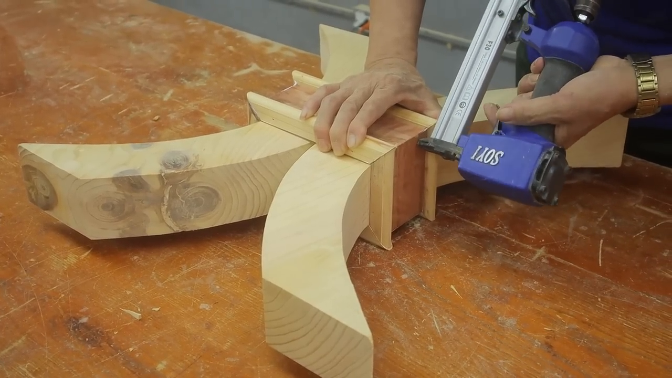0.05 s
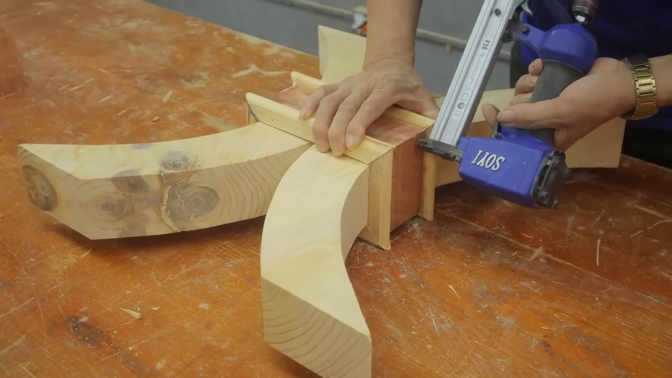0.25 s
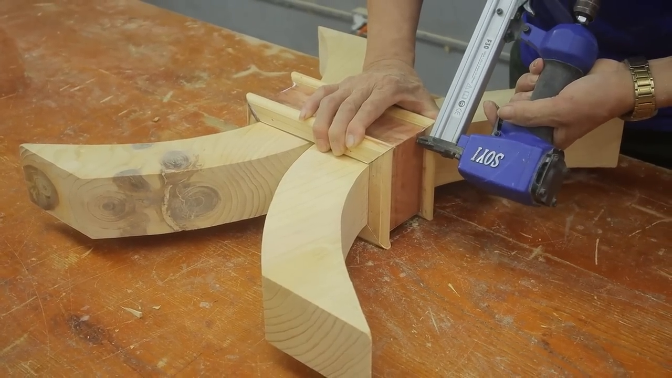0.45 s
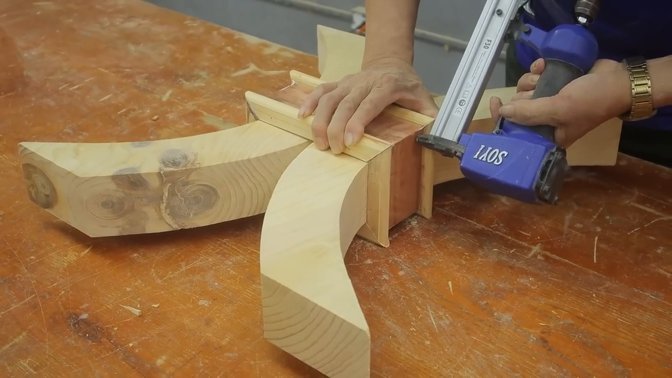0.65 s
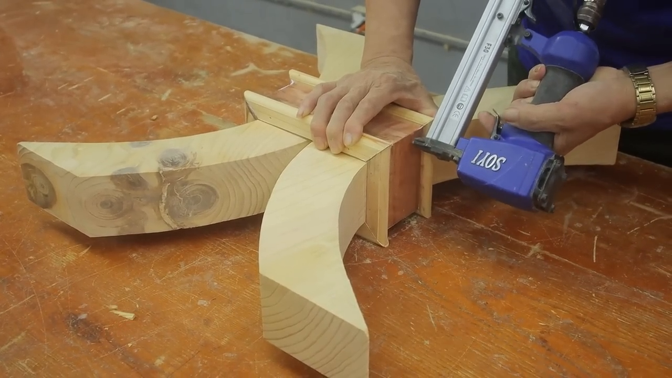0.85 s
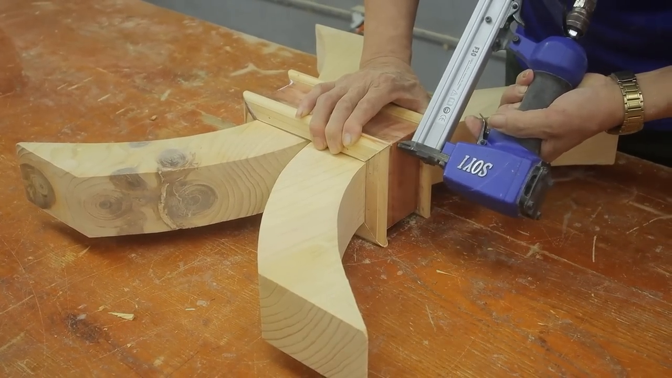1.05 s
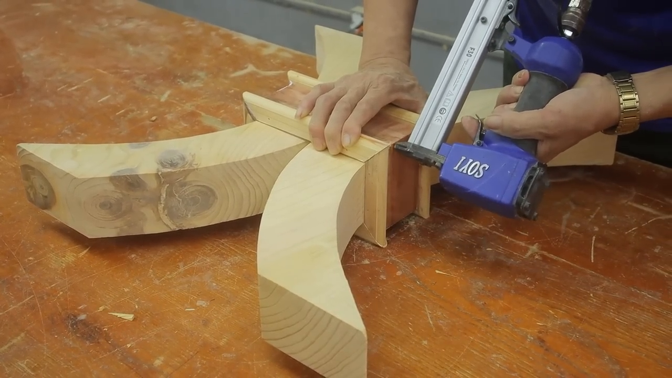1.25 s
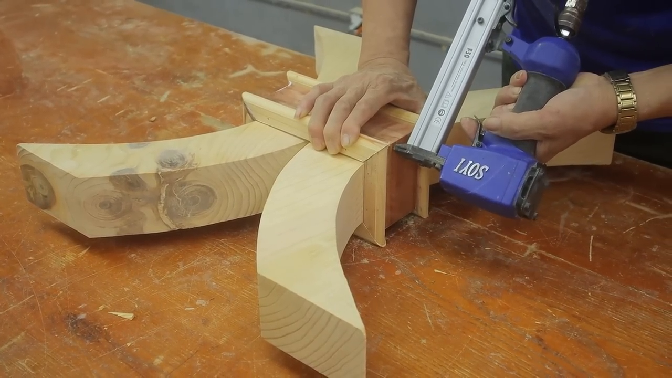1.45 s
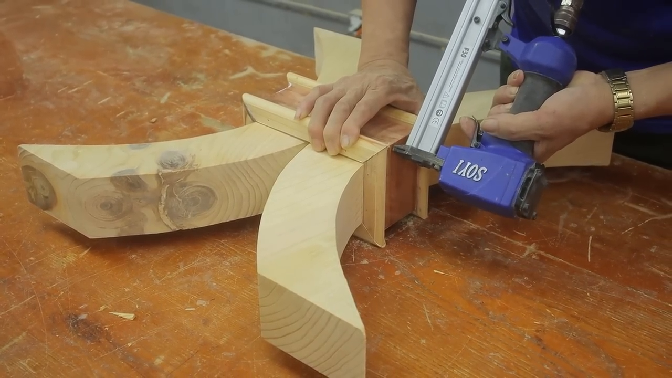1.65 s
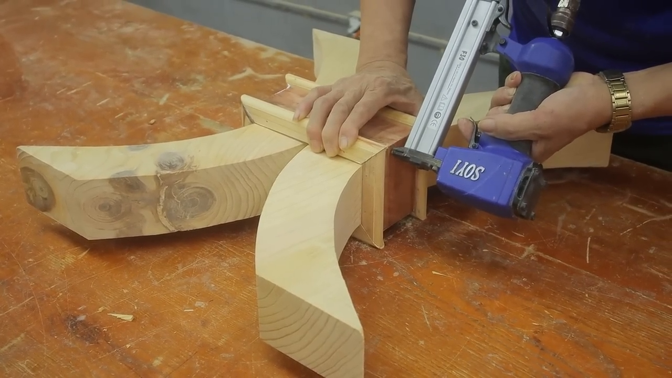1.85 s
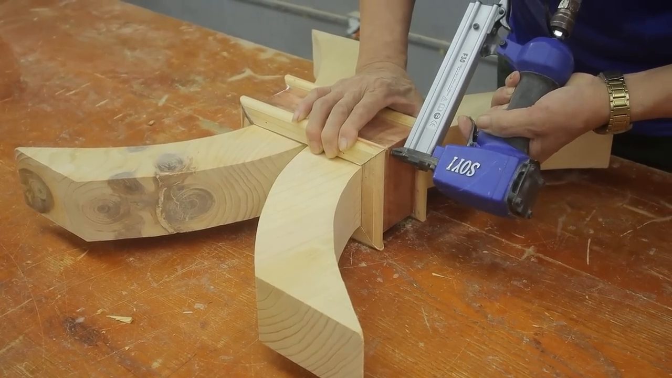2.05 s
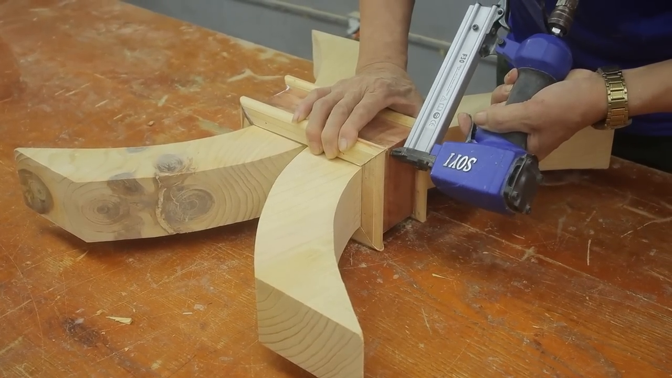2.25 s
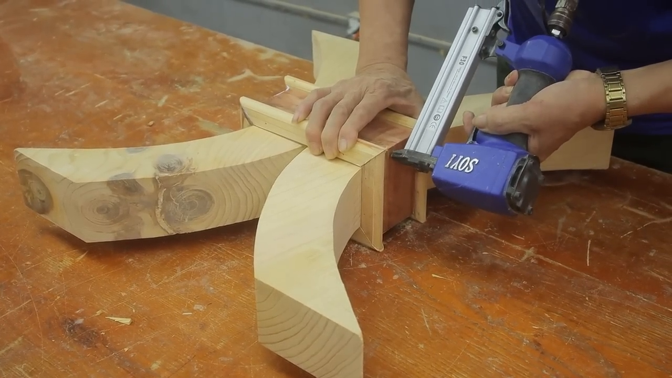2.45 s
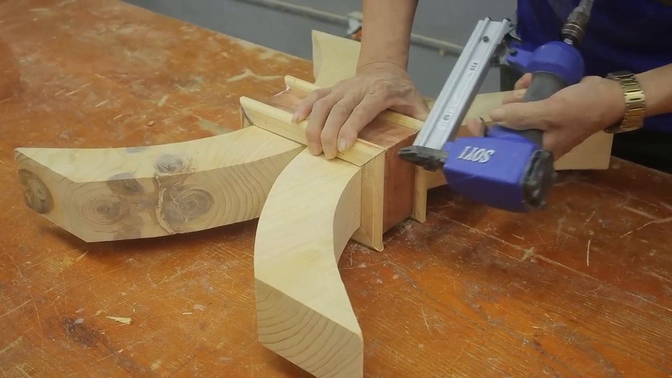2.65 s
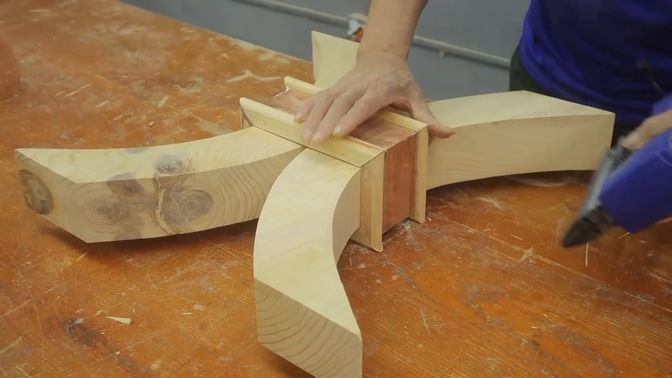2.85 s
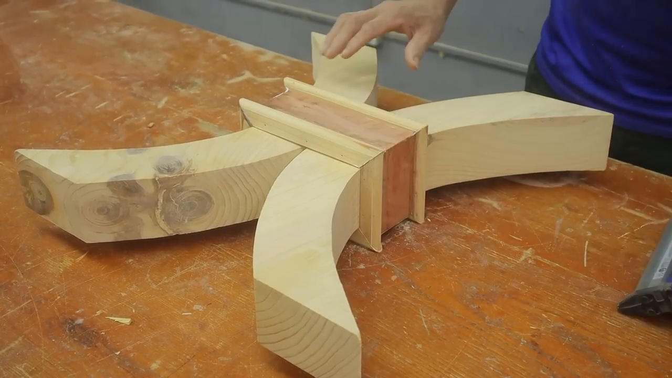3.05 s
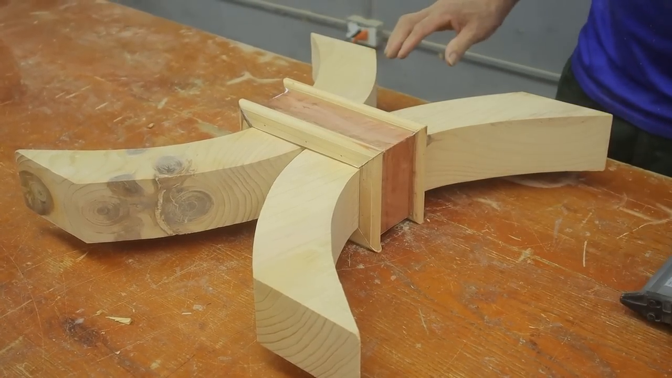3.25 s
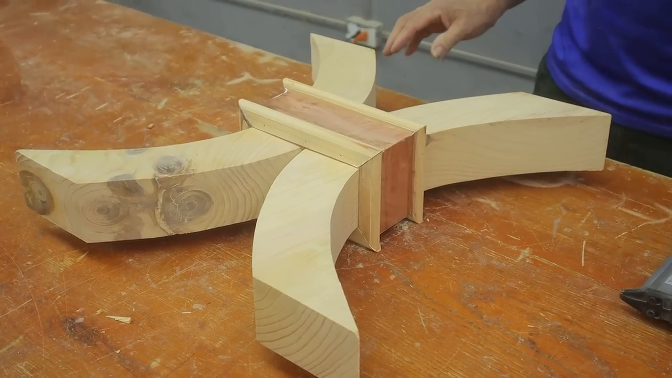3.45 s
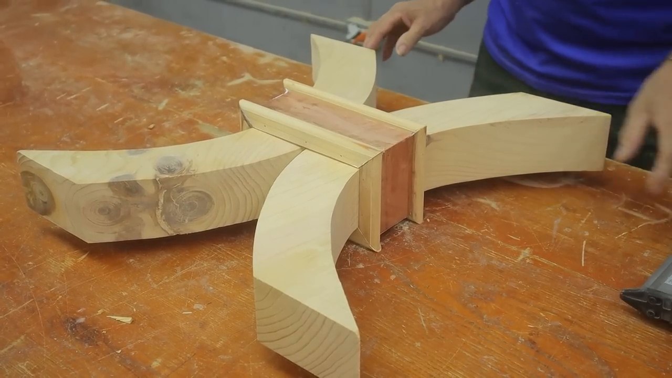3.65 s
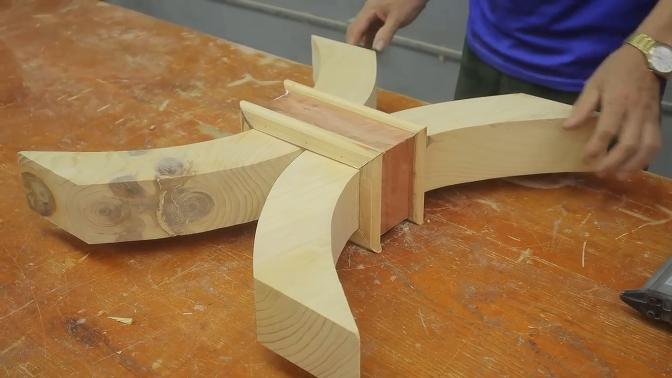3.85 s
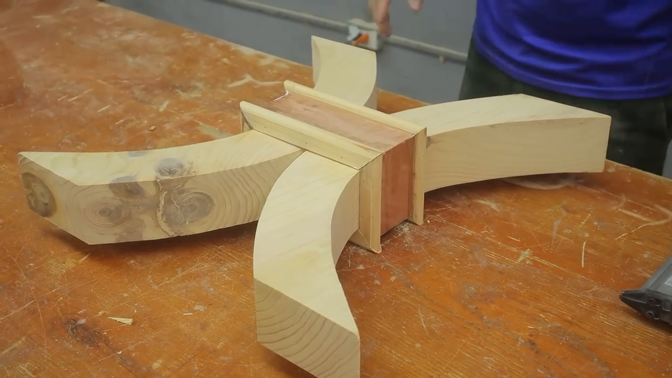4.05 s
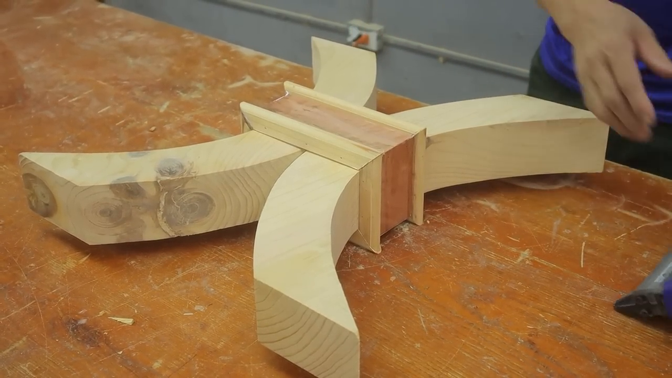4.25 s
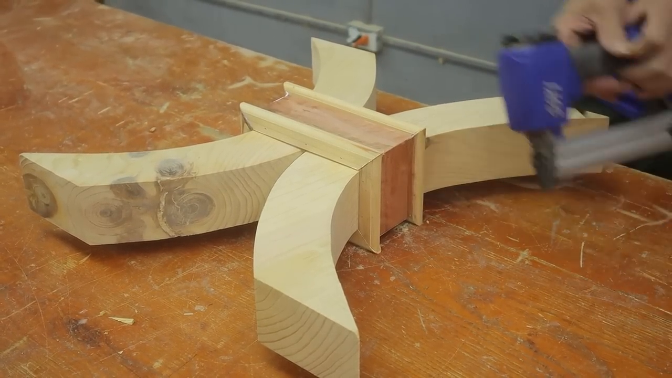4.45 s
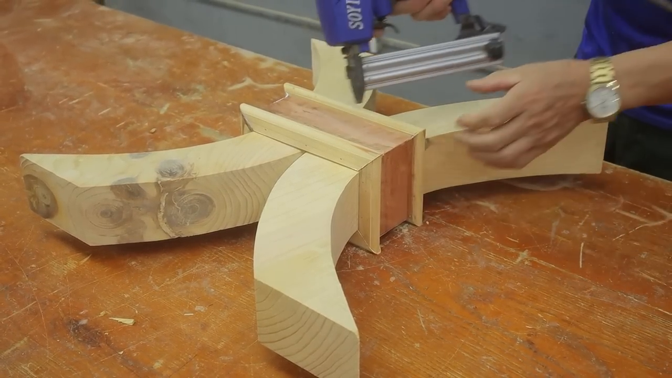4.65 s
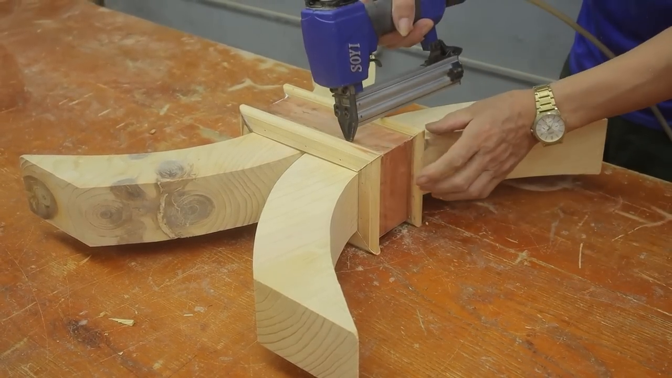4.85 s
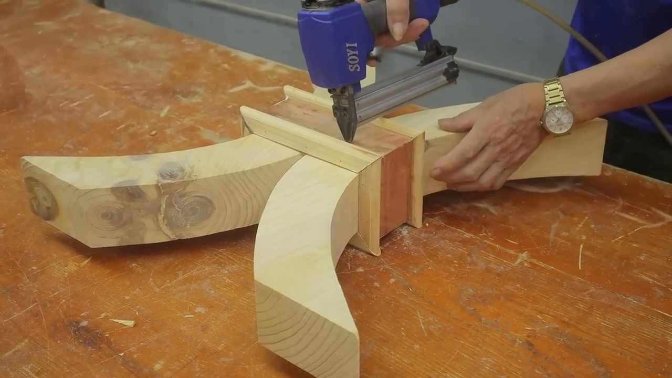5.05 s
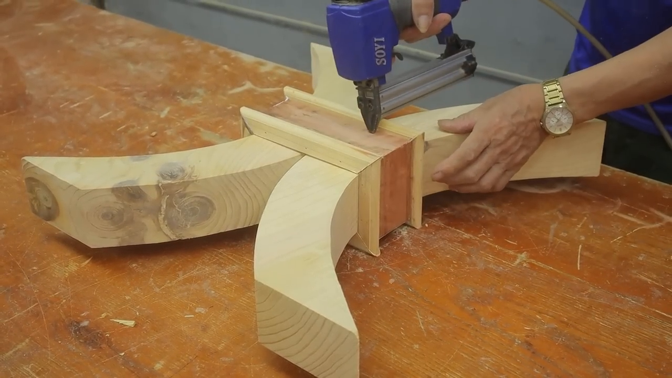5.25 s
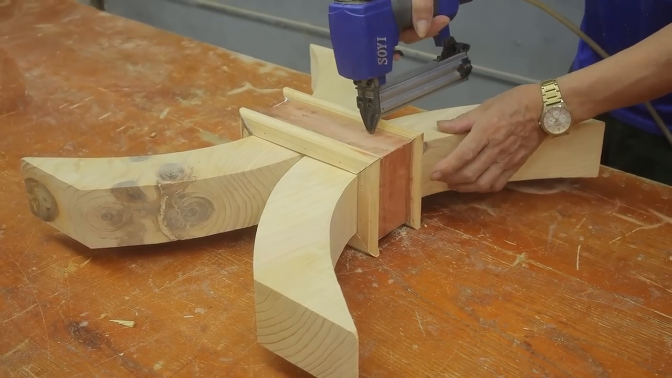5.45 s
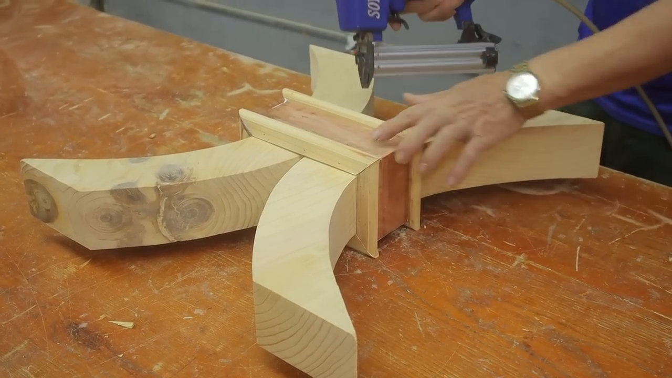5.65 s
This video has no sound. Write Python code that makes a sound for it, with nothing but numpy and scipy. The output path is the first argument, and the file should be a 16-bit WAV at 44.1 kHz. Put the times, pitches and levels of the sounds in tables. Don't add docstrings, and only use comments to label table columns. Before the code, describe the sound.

An air nailer drives pins into pine on a bench: a sharp metallic crack, then a hissy exhaust burst ending in a thump. After a faint wobble of wood and a small squeak comes a second shot. Knocks and a metal click mark the tool being laid down, then a clunk as it is lifted, and two brighter, rapid shots finish. Close stereo pickup, short workshop reverberation, low room noise.

```python
import sys
import numpy as np
from scipy import signal
from scipy.fft import rfft, irfft, next_fast_len
from scipy.io import wavfile

SR = 44100
rng = np.random.default_rng(int(sys.argv[2]) if len(sys.argv) > 2 else 0)


def decibels_to_gain(level_db):
    exponent = np.asarray(level_db, float) / 20
    return 10 ** exponent


def dump_mix(stems):
    frames = np.atleast_2d(stems).T
    limited = np.clip(frames, -1, 1)
    pcm = np.round(limited * 32767).astype(np.int16)
    wavfile.write(sys.argv[1], SR, pcm)


N = 251811

# driver meets pin in seconds, peak in dB, valve in dB, left-right pan in dB,
# slack of the nose on the wood (0-1).
STRIKES = [
    (0.6377, -9, -45.5, 2, 1.0),
    (2.4999, -8.5, -46, 2, 0.41),
    (5.0631, -6.5, -51, 7, 0.01),
    (5.4766, -6.5, -50.5, 5.5, 0),
]
# exhaust opens in seconds, jet in dB, thump in dB, ring in dB, pan in dB.
RELEASES = [
    (0.815, -26, -15.5, -18, 1.5),
    (2.6683, -25, -15.5, -21, 1),
    (5.1420, -29, -20.5, -12.5, 11),
    (5.5609, -27, -20.5, -18, 5.5),
]
GRIP = [0, 0, 1, 1]
STROKE_S = .0088


def at_hz(points, hz):
    table = np.array(points)
    return np.interp(np.log(hz + 1), np.log(table[:, 0]), table[:, 1])


def rms_one(x):
    return x / np.sqrt(np.mean(x ** 2) + 1e-20)


def clock(length_s):
    return np.arange(int(length_s * SR)) / SR


def bump(t, width_s):
    return np.exp(-.5 * (t / width_s) ** 2)


def band(x, low_hz, high_hz):
    edges = [low_hz, min(high_hz, .45 * SR)]
    return signal.sosfilt(signal.butter(2, edges, "band", fs=SR, output="sos"), x)


def ring(push, hz, t60):
    decay = decibels_to_gain(-60 / (t60 * SR))
    turn = 2 * np.pi * hz / SR
    return signal.lfilter([0, np.sin(turn)], [1, -2 * decay * np.cos(turn), decay * decay], push + 1e-18)


def body(push, modes, cycles=30):
    total = 0
    for k, (hz, db, t60) in enumerate(modes):
        total = total + (-1) ** k * decibels_to_gain(db) * ring(push, hz, min(t60, cycles / hz))
    return total


def add(out, x, s, pan_db=0):
    at = int(s * SR)
    treble = signal.sosfilt(signal.butter(1, 1200, "high", fs=SR, output="sos"), x)
    tilt = decibels_to_gain([[pan_db / 2], [-pan_db / 2]]) - 1
    out[:, at:at + len(x)] += (x + treble * tilt)[:, :N - at]


def diffuse(size, colour, likeness):
    hz = np.fft.rfftfreq(size, 1 / SR)
    mid, side = rfft(rng.standard_normal((2, size)))
    alike = np.clip(at_hz(likeness, hz), -1, 1)
    stereo = np.sqrt(1 + alike) * mid + np.sqrt(1 - alike) * side * [[1], [-1]]
    return hz, decibels_to_gain(at_hz(colour, hz)) * stereo


def room_noise():
    # frequency in Hz, level in dB per Hz.
    air_colour = [(15, -34), (30, -13), (60, -4.5), (120, -9), (200, -2.5), (300, -7), (500, -6.5),
                  (1000, -10.5), (1400, -8), (2500, -9), (4000, -12.5), (6300, -20.5), (8000, -27),
                  (11000, -38.5)]
    # frequency in Hz, left-right likeness (-1 to 1).
    likeness = [(60, 1.0), (130, 0.99), (290, 0.98), (640, 0.96), (1410, 0.82), (3100, 0.38), (6820, -0.23),
                (15000, -0.74)]
    # frequency in Hz, width in Hz, level in dB.
    hum_lines = [(178, 7.1, -91), (232.6, 5.1, -83.5), (327, 22, -84.5), (480, 30, -84), (640.6, 22, -83.5),
                 (793, 31, -77), (1609, 21, -86)]
    size = next_fast_len(N)
    hz, spectrum = diffuse(size, air_colour, likeness)
    air = irfft(spectrum, size)[:, :N]
    air = air / np.sqrt(np.mean(band(air.mean(0), 1000, 4000) ** 2))
    white = rfft(rng.standard_normal(size))
    hum = 0
    for line_hz, width_hz, db in hum_lines:
        resonance = 1 / (1 + (2 * (hz - line_hz) / width_hz) ** 2)
        hum = hum + decibels_to_gain(db) * rms_one(irfft(white * resonance, size))
    return decibels_to_gain(-72.5) * air + hum[:N]


def leaks(out):
    # start in seconds, length in seconds, level in dB, low edge in Hz, high edge in Hz.
    hisses = [
        (0.425, 0.045, -87, 8405, 9300),
        (0.548, 0.059, -85, 8520, 9000),
        (2.151, 0.042, -69, 1500, 7680),
        (3.3, .15, -100, 5950, 12000),
    ]
    t = clock(.3)
    for s, length_s, level_db, low_hz, high_hz in hisses:
        shape = np.minimum(t / 0.01, 1) / (1 + (t / length_s) ** 3)
        hiss = rms_one(band(rng.standard_normal(len(t)), low_hz, high_hz))
        add(out, decibels_to_gain(level_db) * shape * hiss, s)


def contacts():
    # start in seconds, level in dB, ring in Hz, t60 in seconds,
    # hard-edge tick in dB.
    taps = [(1.035, -58.5, 268, 0.12, -45), (1.039, -59, 468, 0.17, -48), (1.151, -63, 300, 0.1, -36),
            (1.542, -52.5, 520, 0.051, -26.5), (3.1014, -27, 480, 0.02, -12.5),
            (3.192, -31.5, 636, 0.017, -12), (3.245, -43.5, 503, 0.046, -40),
            (3.434, -48.5, 460, 0.18, -15), (4.117, -57, 480, 0.038, -39), (4.9014, -39, 460, 0.19, -12),
            (4.902, -47.5, 194, 0.15, -53.5)]
    # start in seconds, level in dB, echo in dB.
    setdowns = [
        (3.269, -27, -14),
        (4.2836, -29, -17),
    ]
    # start in seconds, level in dB, ring in Hz, tick in dB.
    clicks = [
        (3.184, -40.5, 900, 4.5),
        (5.034, -54, 3330, 5),
    ]
    # start in seconds, level in dB.
    thuds = [
        (.69, -54.5),
        (1.699, -61.5),
        (2.72, -59.5),
    ]
    blunt_db = -50
    body_tick_db = -13
    magazine_db, magazine_lag_s = -2, 0.0018
    rows = [(s, db, hz, t60, -17.5, tick_db) for s, db, hz, t60, tick_db in taps]
    for s, db, echo_db in setdowns:
        rows.append((s, db, 639, 0.17, echo_db, body_tick_db))
        rows.append((s + magazine_lag_s, db + magazine_db, 1410, 0.064, echo_db, body_tick_db - magazine_db))
    rows += [(s, db, hz, 0.014, -42, tick_db) for s, db, hz, tick_db in clicks]
    rows += [(s, db, 57.56, 0.22, blunt_db, blunt_db) for s, db in thuds]
    for k in range(4):
        rows.append((1.688 + k * .0095, -56 - 1.2 * (k - 3 / 2) ** 2, 150, .016, -40, blunt_db))
    return rows


def knocks(out):
    # frequency in Hz, level in dB, t60 in seconds.
    bench_modes = [(197.8, -9, 0.051), (284, 2, 0.027), (520, -0.5, 0.03), (816, 2.5, 0.021),
                   (900, -10, 0.062), (1165, -0.5, 0.024), (1370, -2, 0.037), (1670, 2, 0.012),
                   (2174, -2, 0.004), (2820, -7.5, 0.0098), (3650, -26.5, 0.018)]
    bench_share_db = -4.5
    t = clock(.35)
    for s, level_db, hz, t60, echo_db, tick_db in contacts():
        rattle = .35 * rng.standard_normal(len(t)) * np.exp(-t / .003)
        contact = rattle + 3.0 * (t == 0)
        soft = signal.sosfilt(signal.butter(1, min(4.1 * hz, 9000), fs=SR, output="sos"), contact)
        bench = decibels_to_gain(bench_share_db) * body(soft, bench_modes) * min(hz / 300, 1) ** 2
        wood = ring(soft, hz, t60) + bench
        tick = decibels_to_gain(tick_db) * band(contact, 2500, 6300)
        add(out, decibels_to_gain(level_db) * (wood / np.max(np.abs(wood)) + tick), s, -1.5)


def echo(s, level_db, colour):
    # frequency in Hz, t60 in seconds.
    room_t60 = [(60, 0.11), (200, 0.41), (700, 0.31), (1800, 0.37), (4800, 0.31), (12000, 0.3)]
    # frequency in Hz, left-right likeness (-1 to 1).
    echo_likeness = [(60, 1.0), (130, 1.0), (290, 1.0), (640, 0.98), (1410, 0.88), (3100, 0.66),
                     (6820, -0.03), (15000, -0.6)]
    early_db, early_t60_s = 7.5, 0.061
    t = np.arange(2 ** 14) / SR
    hz, noise = diffuse(len(t), colour, echo_likeness)
    noise = noise / np.std(irfft(noise))
    tail = 0
    for centre in 40 * 2 ** np.arange(9.):
        octaves = np.clip(np.log2((hz + 1) / centre), -1, 1)
        part = irfft(noise * np.cos(np.pi / 2 * octaves) ** 2)
        tail = tail + part * decibels_to_gain(-60 * t / at_hz(room_t60, centre))
    build_up = np.clip((t - .001) / 0.0056, 0, 1)
    tail = tail * build_up * (1 + decibels_to_gain(early_db - 60 * t / early_t60_s))
    out, at = np.zeros((2, N + len(t))), int(s * SR)
    out[:, at:at + len(t)] = decibels_to_gain(level_db) * tail
    return out[:, :N]


def workshop():
    # frequency in Hz, level in dB per Hz.
    strike_sideways = [(35, -41), (60, -16), (118, -25), (217, -2), (437, -14.5), (636, 0.5), (903, -12.5),
                       (1440, -2.5), (2770, -0.5), (3040, -2), (5300, -8), (11500, -24), (16000, -43.5)]
    strike_downward = [(35, -67.5), (60, -61), (172, 1), (371, -14.5), (458, -0.5), (621, -7), (715, -11.5),
                       (822, -10.5), (924, -14), (1660, 0.5), (3580, -9.5), (5200, -13.5), (16000, -37.5)]
    release_colour = [(35, -64), (60, -14), (113, -18), (156, -12.5), (193, 0.5), (315, -12.5), (579, -6.5),
                      (1050, -19), (1600, -11.5), (2250, -12), (2900, -23.5), (3850, -11), (6580, -27),
                      (11800, -21.5), (16000, -33)]
    knock_colour = [(60, -58), (165, -11), (330, -11), (700, -6), (1050, -14), (1450, -15.5), (1850, -18),
                    (2400, -20), (3500, -33.5), (6000, -36), (12000, -62), (16000, -49)]
    strike_echo_db = [-27.5, -23.5]
    release_echo_db = [-21, -16]
    slack_echo_db = 4.5
    ring_lift_db = 9.5
    strike_colours = [strike_sideways, strike_downward]
    out = np.zeros((2, N))
    for (s, peak_db, valve_db, pan_db, slack), grip in zip(STRIKES, GRIP):
        level_db = peak_db + strike_echo_db[grip] + slack * slack_echo_db
        out += echo(s, level_db, strike_colours[grip])
    for (opens, jet_db, thump_db, ring_db, pan_db), grip in zip(RELEASES, GRIP):
        out += echo(opens + STROKE_S, thump_db + release_echo_db[grip], release_colour)
    hz = np.geomspace(30, 20000, 200)
    for s, level_db, ring_hz, t60, echo_db, tick_db in contacts():
        lift_db = ring_lift_db / (1 + ((hz / ring_hz - 1) / 0.07) ** 2)
        out += echo(s, level_db + echo_db, np.transpose([hz, at_hz(knock_colour, hz) + lift_db]))
    return out


def releases(out):
    # frequency in Hz, level in dB per Hz.
    jet_colour = [(710, -35.5), (1200, -2.5), (3320, -15.5), (3950, -1), (5710, -8), (6230, -2.5),
                  (7910, -7), (8820, -3), (9610, -5.5), (16000, -9)]
    # frequency in Hz, level in dB, t60 in seconds.
    cap_modes = [(1687, -5, 0.024), (2050, -2, 0.0078), (4350, -14, 0.0063), (4430, 0, .008),
                 (6930, -24, 0.0015), (12500, -19.5, .003)]
    # frequency in Hz, level in dB, t60 in seconds.
    boom_modes = [(184, -58.5, 0.42), (300, -37, 0.012), (460, -47, 0.11), (567, -66, 0.18),
                  (805, -49.5, 0.1012)]
    boom_db = [-9, -0.5]
    t = clock(.4)
    since = t - STROKE_S
    hz = np.fft.rfftfreq(len(t), 1 / SR)
    flow = np.minimum(t / .002, 1) * (1 - .45 * np.exp(-((t - .0058) / .001) ** 2))
    flow = np.where(since < 0, flow, 0.41 * np.exp(-np.abs(since) / 0.012))
    swell = .13 * (1 - 2 * (t - .001) / .0045) * (t > .001) * (t < .0055)
    surge = swell - .2 * bump(t - .0005, .0003) + .1 * bump(t - .006, .0005)
    wave = 1.5 * bump(since + .0003, .00028)
    wave = wave - .75 * bump(since - .0006, .00022) - .45 * bump(since - .0015, .0006)
    port_sound = band(wave + surge, 150, 12000)
    since_hit = since + .0007
    for (opens, jet_db, thump_db, ring_db, pan_db), grip in zip(RELEASES, GRIP):
        hiss = rms_one(irfft(rfft(rng.standard_normal(len(t))) * decibels_to_gain(at_hz(jet_colour, hz)), len(t)))
        thump = decibels_to_gain(thump_db) * port_sound
        rattle = .4 * rng.standard_normal(len(t))
        clean_hit = 3 * (np.abs(since_hit) < .5 / SR)
        stop = np.exp(-np.abs(since_hit) / .0002) * (since_hit > 0) * (rattle + clean_hit)
        cap = body(stop, cap_modes)
        sound = decibels_to_gain(jet_db) * flow * hiss + thump + decibels_to_gain(ring_db) * cap / np.max(np.abs(cap))
        boom = decibels_to_gain(boom_db[grip]) * body(thump, boom_modes, cycles=140)
        add(out, sound + boom, opens, pan_db)


def strikes(out):
    # frequency in Hz, t60 in seconds, level in dB with the nose firm,
    # level in dB with it slack.
    nose_modes = [(344, 0.0083, -23, -20.5), (579, 0.021, -15.5, -16.5), (1340, 0.014, -12, -19.5),
                  (1500, .03, -14, -14), (1915, .010, -5.5, -20), (2373, 0.0043, 0.5, -20),
                  (2947, 0.0079, -18.5, -18), (3240, 0.0033, -11.5, -24.5), (4095, 0.0065, -0.5, -14),
                  (4775, 0.0038, -3, -7.5), (5880, 0.0015, -2.5, -7.5), (8440, 0.0022, -8, -18),
                  (10700, 0.0022, -9, -19.5), (13310, 0.006, -17, -23)]
    # delay in seconds, level in dB.
    rebounds = [
        (0, -8),
        (.0004, 2),
        (.0011, -5),
        (.0019, -8),
        (.0048, -11),
        (.0066, -16),
        (.0085, -18),
    ]
    valve_lead_s = .0102
    t = clock(.3)
    blows = sum(decibels_to_gain(db) * (t >= at) * np.exp(-np.abs(t - at) / 0.00015) for at, db in rebounds)
    clean_blow = 3.0 * (np.abs(t - rebounds[1][0]) <= .5 / SR)
    tick = ring(-1. * (t < .0006), 450, 0.017) * 0.047
    for s, peak_db, valve_db, pan_db, slack in STRIKES:
        air, rattle = rng.standard_normal((2, len(t)))
        inrush = band(air, 1500, 12000) * (t < valve_lead_s) * np.exp(-t / 0.014)
        add(out, decibels_to_gain(valve_db) * (inrush + tick), s - valve_lead_s, pan_db)
        push = 0.5 * blows * rattle + clean_blow
        modes = [(hz, firm_db + slack * (slack_db - firm_db), t60) for hz, t60, firm_db, slack_db in nose_modes]
        crack = body(push, modes) + 0.2 * band(push, 2200, 16000)
        add(out, decibels_to_gain(peak_db) * crack / np.max(np.abs(crack)), s, pan_db)


def ports(x):
    # frequency in Hz, level in dB.
    left_shadow = [(100, -0.5), (700, -1.5), (2400, -3.5), (4400, -7), (8000, -5), (15000, -1.5)]
    lag_s = 3e-5
    size = next_fast_len(N)
    hz = np.fft.rfftfreq(size, 1 / SR)
    shadow = decibels_to_gain(at_hz(left_shadow, hz) / 2)
    lag = np.exp(-2j * np.pi * np.minimum(hz, 10500) * lag_s)
    return irfft(rfft(x, size) * [shadow * lag, 1 / shadow], size)[:, :N]


def scene():
    near = np.zeros((2, N))
    for source in (leaks, knocks, releases, strikes):
        source(near)
    return ports(near) + workshop() + room_noise()


def roll_off(x):
    return signal.sosfilt(signal.butter(12, 16990, fs=SR, output="sos"), x)


def record(dry):
    x = signal.sosfilt(signal.butter(2, 45, "high", fs=SR, output="sos"), dry)
    x = signal.sosfilt(signal.cheby2(10, 30, 16400, fs=SR, output="sos"), x)
    return roll_off(x)


dry = scene()
out = record(dry)
dump_mix(out)
```